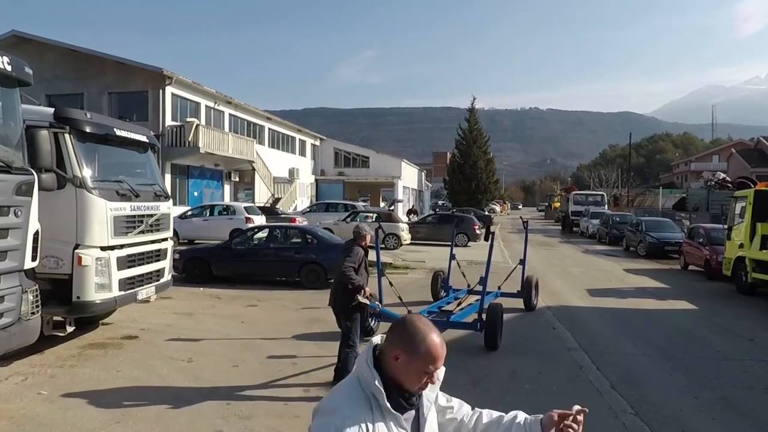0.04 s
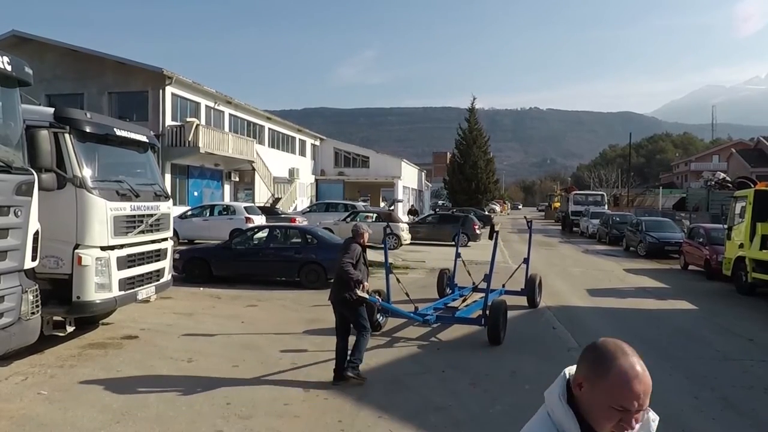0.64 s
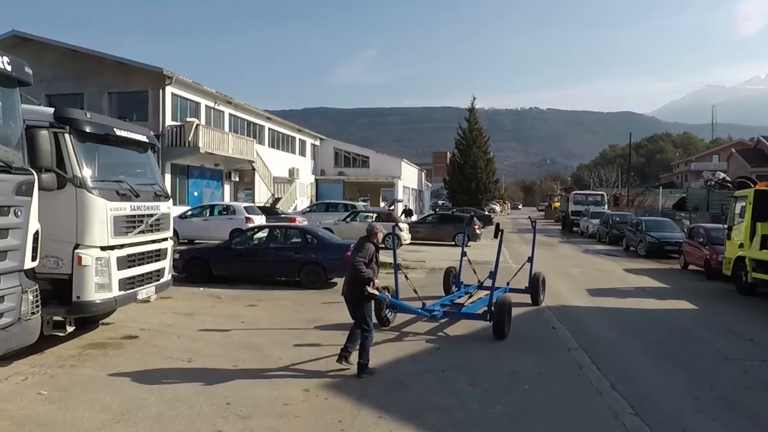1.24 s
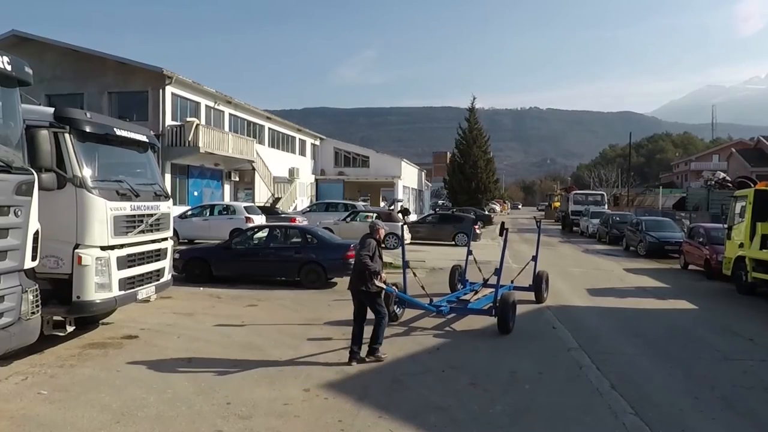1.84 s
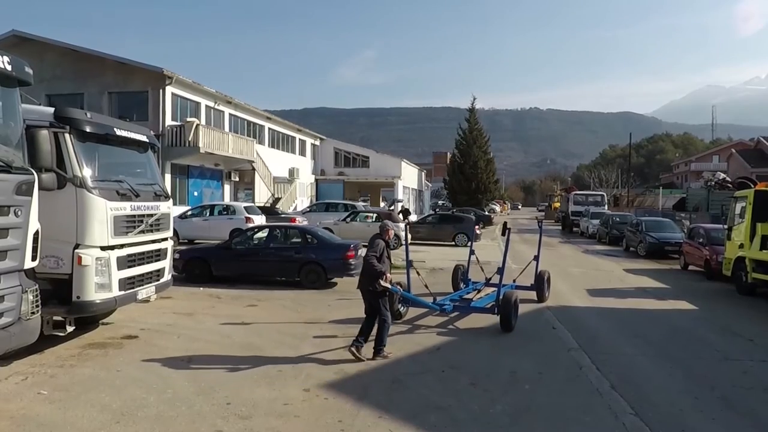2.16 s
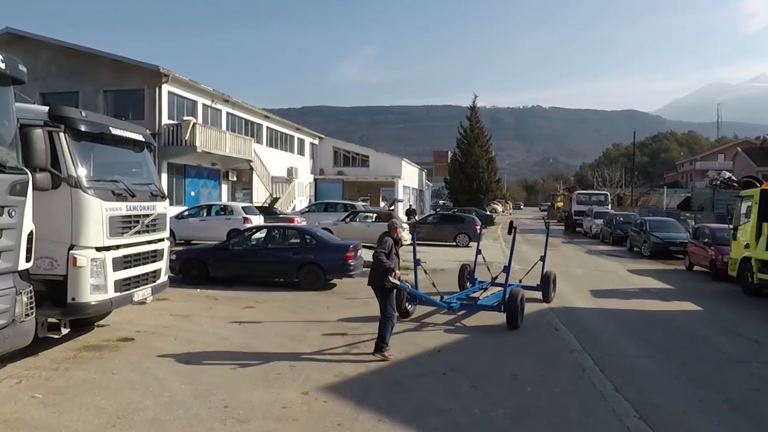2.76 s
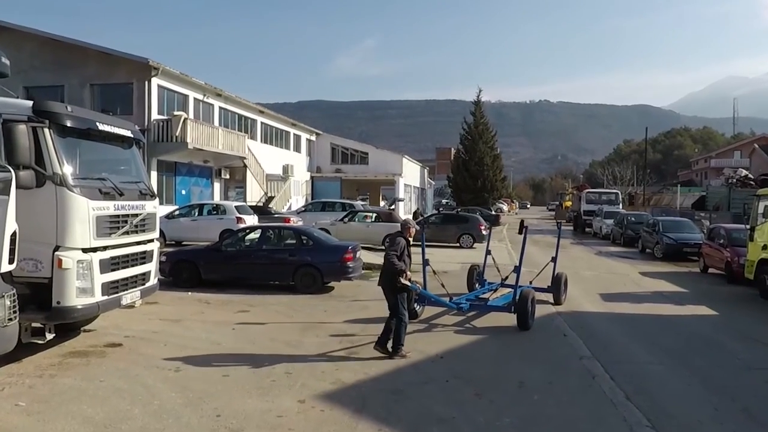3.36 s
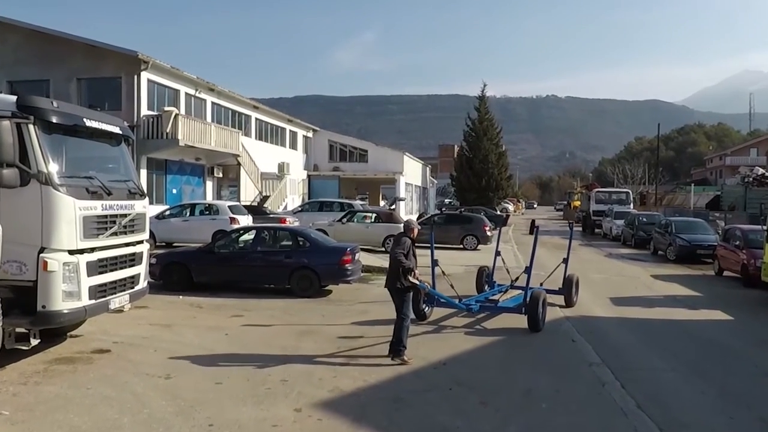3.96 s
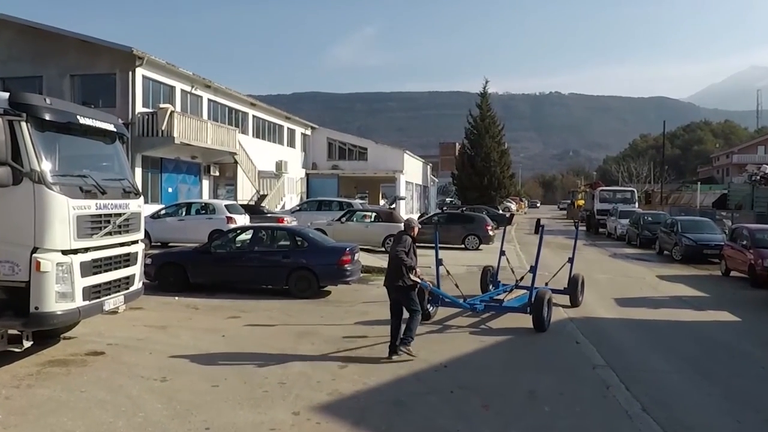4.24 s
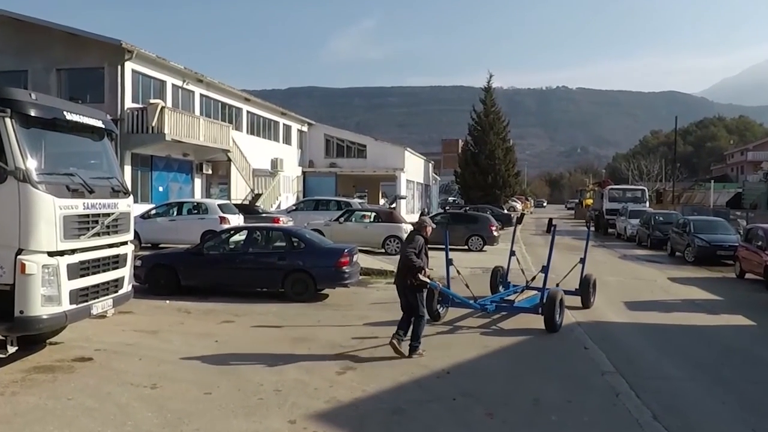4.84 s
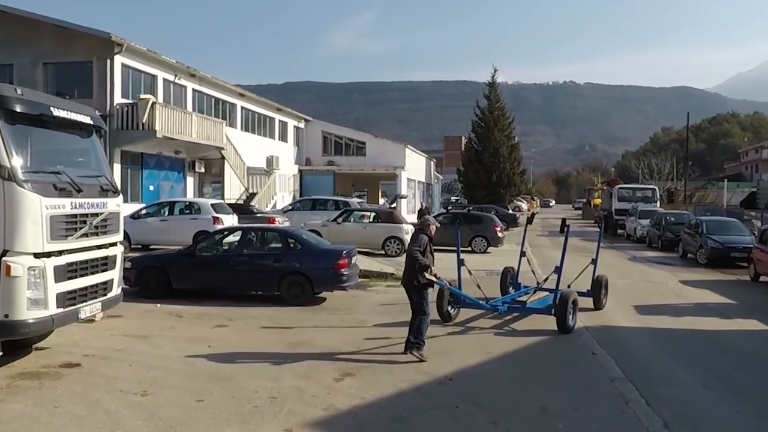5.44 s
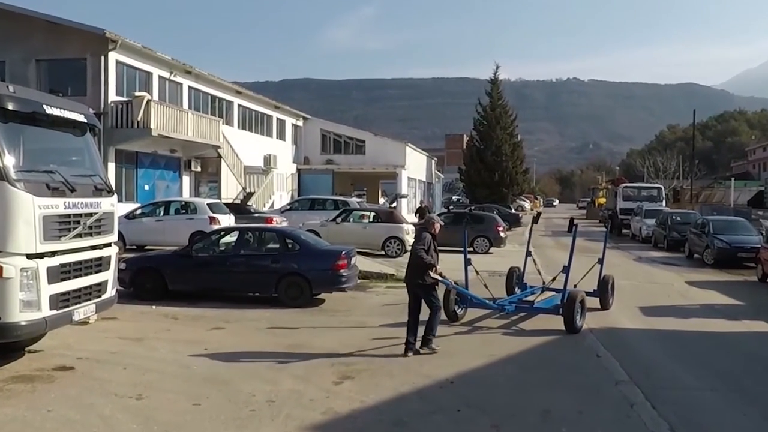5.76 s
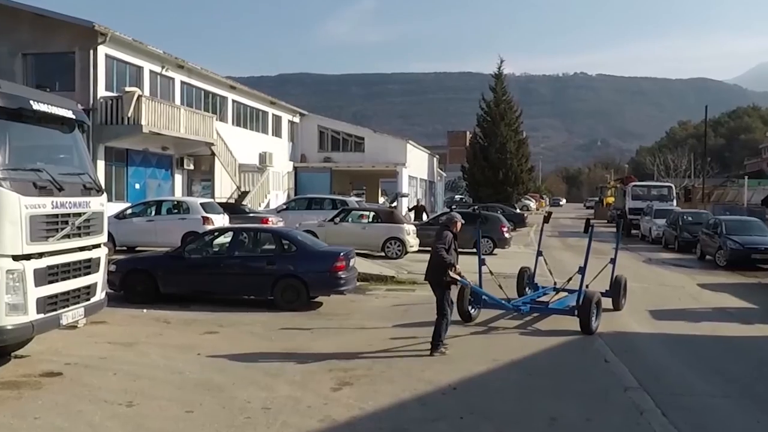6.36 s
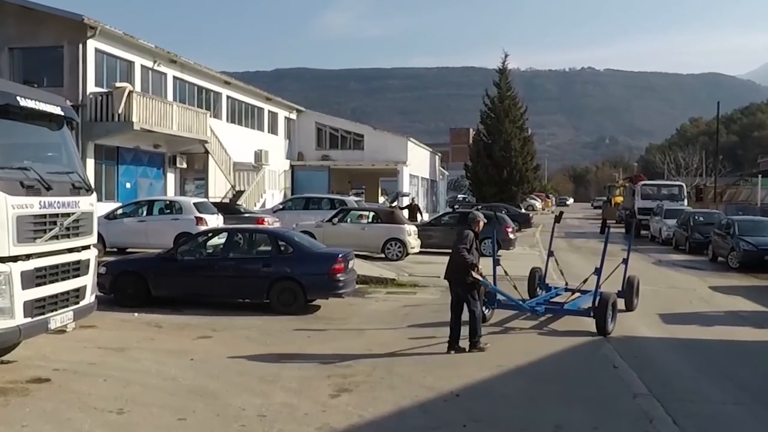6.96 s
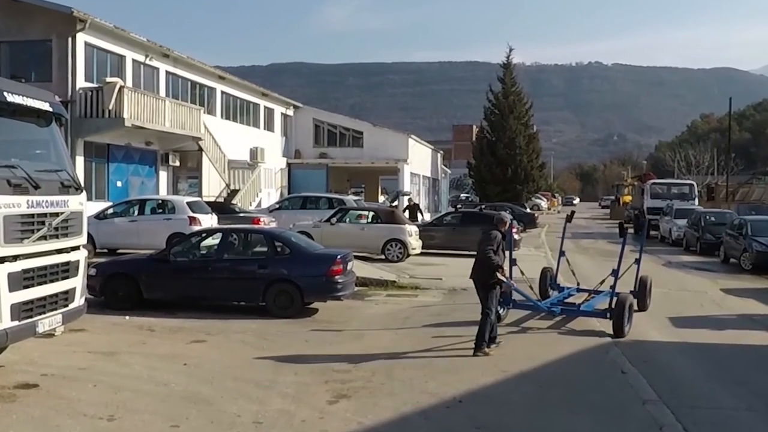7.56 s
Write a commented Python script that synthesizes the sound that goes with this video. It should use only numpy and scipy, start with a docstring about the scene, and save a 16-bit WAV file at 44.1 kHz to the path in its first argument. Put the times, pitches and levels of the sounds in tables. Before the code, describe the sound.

An engine idles with a deep, steady throb in an outdoor yard, over faint hiss and the gritty roll of a trailer pulled by hand across asphalt. Close thumps and scuffs come from the microphone being gripped, followed by one hard rattle, after which the background drops away and creeps back. The sound narrows from stereo to mono. Near the end the engine runs down and stops, and the trailer's wheels squeak thinly.

```python
"""First you hear an engine throbbing at idle, while a boat trailer is pulled by hand across an asphalt yard.
From two seconds on, a camera is gripped and shifted: thumps, scuffs and one hard rattle sound on its
mount, and after each heavy knock the background sinks and creeps back. The sound narrows to a single
microphone, then partly widens. Near the end the engine is switched off and the trailer's wheels squeak."""
import sys
import numpy as np
from scipy import signal
from scipy.fft import rfft, irfft, next_fast_len
from scipy.io import wavfile
from scipy.ndimage import uniform_filter1d

SR = 44100
rng = np.random.default_rng(int(sys.argv[2]) if len(sys.argv) > 2 else 0)


def transcribe(u):
    """Save the signal u as a 16-bit wav file named by the first command-line argument.

    u: samples, shape (n,) or (channels, n), limited to [-1, 1]; the rate is SR.
    q: integer samples, one column per channel.
    """
    v = np.clip(np.atleast_2d(u).T, -1, 1)
    q = np.round(v * 32767).astype(np.int16)
    wavfile.write(sys.argv[1], SR, q)


N = 338996
TIME = np.arange(N) / SR


def gain_of(db):
    """Turns decibels into a number to multiply by."""
    return 10 ** (np.asarray(db) / 20)


def evened(x):
    """Scales a signal to an average strength (rms) of 1."""
    return x / np.sqrt(np.mean(x ** 2) + 1e-20)


def over_time(points):
    """Joins (time, value) points with straight lines."""
    return np.interp(TIME, *np.transpose(points))


def over_pitch(points, hz):
    """Joins (pitch, value) points, giving each octave equal room."""
    pitches, values = np.transpose(points)
    return np.interp(np.log(hz + 1), np.log(pitches + 1), values)


def hump(f, hz, octaves):
    """A bell-shaped band of pitches around hz."""
    return np.exp(-.5 * (np.log2((f + 1) / hz) / octaves) ** 2)


def add(mix, start_s, sound):
    """Mixes a stereo sound in at start_s."""
    part = mix[:, max(round(start_s * SR), 0):][:, :sound.shape[1]]
    part += sound[:, :part.shape[1]]


def stereo(mid, side):
    """Both ears share mid; side is added on the left and taken away on the right."""
    return np.array([mid + side, mid - side])


def colour(x, gain):
    """Turns each pitch in x up or down by gain(hz)."""
    size = next_fast_len(x.shape[-1] + 2048)
    return irfft(rfft(x, size) * gain(np.fft.rfftfreq(size, 1 / SR)), size)[..., :x.shape[-1]]


def drift(rate_hz):
    """A smooth random wobble, about 1 in size."""
    knots = signal.resample(rng.standard_normal(1024), 8192)
    return np.interp(TIME * rate_hz * 16, np.arange(len(knots)), knots)


# How wide the noises sound: pitch_hz, side_over_mid_db
NOISE_WIDTH = [(60, 1), (110, -1), (200, 0.5), (370, 2), (690, 3.5), (1270, 1.5), (2340, -0.5), (4300, -3),
               (7910, 4.5), (14600, 0.5)]
# Which way they lean: pitch_hz, lean (-1 right, 1 left)
NOISE_LEAN = [(30, 0.21), (140, 0.054), (190, -0.32), (240, 0.98), (380, 0.38), (600, 0.46), (1100, -0.65),
              (2000, -0.37), (6000, -0.41), (12000, -0.2)]
def noise(tone):
    """Steady stereo noise, shaped by a table of pitches and levels."""
    common, stray = rng.standard_normal((2, N))
    shape = lambda hz: gain_of(over_pitch(tone, hz))
    wide = lambda hz: shape(hz) * gain_of(over_pitch(NOISE_WIDTH, hz))
    lean = lambda hz: np.clip(over_pitch(NOISE_LEAN, hz), -1, 1)
    mid = colour(common, shape)
    side = colour(common, lambda hz: wide(hz) * lean(hz))
    side += colour(stray, lambda hz: wide(hz) * np.sqrt(1 - lean(hz) ** 2))
    return stereo(mid, side) / np.std(mid)


# Dips in the background after heavy knocks: start_s, depth_db, hold_s, recovery_s
DIPS = [(2.032, 10, 0.022, 0.74), (2.333, 8, 0.18, 0.9), (3.664, 27, 0.55, 2.25)]
def dip_db(sink_s=.02):
    """How far the background has sunk: a quick fall, a hold, then a return that slows down."""
    deepest = np.zeros(N)
    for start_s, depth_db, hold_s, recovery_s in DIPS:
        sink = np.clip((TIME - start_s) / sink_s, 0, 1)
        remaining = np.clip(1 - (TIME - start_s - hold_s) / recovery_s, 0, 1) ** 1.41
        deepest = np.maximum(deepest, depth_db * sink * remaining)
    return deepest


def switch_off_db(fall_db, fall_s, start_s=6):
    """How far a sound has faded since the engine was switched off."""
    return fall_db * np.clip((TIME - start_s) / fall_s, 0, 1)


# Tone of a broad hiss and of a narrower, sharper sizzle: pitch_hz, relative_db
HISS_TONE = [(1530, -8), (2600, -3), (3190, -6.5), (4710, -2), (5820, -1), (6270, 0), (7260, -6),
             (8280, -11), (9310, -11.5), (12400, -20.5), (13700, -24), (14500, -52), (15000, -74)]
SIZZLE_TONE = [(4400, -34), (5000, -10.5), (5500, 2), (6200, 2), (7200, -3.5), (7700, -8), (8300, -31),
               (10000, -20), (12500, -32.5), (14000, -49)]
# Their loudness before the dips: time_s, level_db
HISS_LEVEL = [(0, -53), (.99, -53.5), (1.06, -49), (2, -47), (3.7, -48.5), (5.95, -46.5), (6.6, -50.5),
              (7.69, -51)]
SIZZLE_LEVEL = [(0, -64), (1.01, -66), (1.05, -50.5), (2, -49), (2.8, -51.5), (3.6, -48.5), (4.6, -58.5),
                (6.6, -71), (7.5, -50)]
def far_hiss(flicker_db=1):
    """A distant, flickering hiss; after a second it steps up and a sizzle cuts in."""
    hiss = noise(HISS_TONE) * gain_of(over_time(HISS_LEVEL) - dip_db() + flicker_db * drift(25))
    sizzle = noise(SIZZLE_TONE) * gain_of(over_time(SIZZLE_LEVEL) - dip_db() + flicker_db * drift(25))
    return hiss + sizzle


# Tone of the deep buffeting and of the rumble: pitch_hz, relative_db
BUFFET_TONE = [(6, -19.5), (14, 0.5), (30, -4.5), (42, -13), (65, -10.5), (100, -20), (200, -50),
               (500, -140)]
RUMBLE_TONE = [(8, -17.5), (15, 1.5), (35, -4.5), (70, 2.5), (105, 3), (140, 7), (185, -5.5), (235, -9),
               (280, -2), (320, -8), (400, -15), (520, -26), (800, -52), (1600, -120)]
# Loudness of the rumble before the dips: time_s, level_db
RUMBLE_LEVEL = [(0, -32.5), (2, -31), (3.6, -29), (4.2, -30), (4.8, -26), (5.5, -29.5), (6.3, -28),
                (6.5, -30.5), (7, -38.5), (7.69, -41.5)]
def low_rumble(firings, pulse_depth=.47, buffet_db=-37, buffet_rise_db=6, wobble_db=1):
    """A rumble pulses with the engine, over buffeting that grows as the engine stops."""
    stopped = np.clip((TIME - 6.6) / .36, 0, 1)
    buffet = noise(BUFFET_TONE) * gain_of(buffet_db - dip_db() + buffet_rise_db * stopped)
    turning = TIME < FIRING_RATE[-1][0]
    pulse = 1 + pulse_depth * np.cos(2 * np.pi * (firings - BODY_LAG)) * turning
    rumble = noise(RUMBLE_TONE) * gain_of(over_time(RUMBLE_LEVEL) - dip_db() + wobble_db * drift(7.3))
    return buffet + pulse * rumble


# The engine idles, then runs down: time_s, firings_per_s
FIRING_RATE = [(0, 27.33), (6, 27.37), (6.27, 25.3), (6.42, 19.6), (6.6, 17), (6.8, 10.5)]
def count_firings(first_s=.0106):
    """How many times the engine has fired so far, as a smoothly rising count."""
    return np.cumsum(over_time(FIRING_RATE)) / SR - first_s * FIRING_RATE[0][1]


BODY_LAG = .28  # the engine's body answers each throb this share of a firing later
# Engine tones; four unequal cylinders add halves and quarters:
# multiple_of_firing_rate, relative_db, side_share (positive leans left)
ENGINE_TONES = [(.5, -6, 0), (1, 0, .1), (1.5, -18, 0), (2, -9.5, .15), (2.5, -21, .1), (3, -14.5, .3),
                (3.75, -21, -.2), (4, -11, .1), (5, -9.5, -.2), (5.25, -11.5, -.1), (5.5, -19, -.3),
                (6, -16.5, -.1), (7, -30, -1.8), (8, -25, 1.3), (8.34, -23, 1.1), (9, -23, 1.3),
                (9.75, -24.5, 1.2), (10, -21.5, 1.1), (10.5, -28, 1.4), (11, -29, .6), (12, -29, 1.2),
                (13, -25, 1.7), (14, -29, 1.3), (14.25, -35, 1.7), (15, -38, 1), (16, -37, -.9),
                (18, -35, -.1), (19, -34, 1.1)]
def engine(firings, idle_db=-22, body_above_multiple=2.4, loose_multiple=9):
    """Low tones line up into a throb and a chug at each firing; all die as the engine stops."""
    firings = firings + .009 * drift(3)  # the speed is never quite steady
    out = np.zeros((2, N))
    for multiple, db, side in ENGINE_TONES:
        strength = gain_of(db) * (1 + (.04 + .02 * multiple) * drift(5))
        lag = BODY_LAG * (multiple > body_above_multiple)
        looseness = min((multiple / loose_multiple) ** 3, 1)  # high tones fall out of step
        cycles = multiple * (firings - lag) + looseness * rng.uniform(-.5, .51)
        tone = strength * np.cos(2 * np.pi * cycles)
        out += stereo(tone, side * tone)
    level_db = idle_db - 1.15 * dip_db() - switch_off_db(fall_db=10.5, fall_s=.5)
    running = np.clip((6.85 - TIME) / .39, 0, 1)
    return np.sqrt(2) * out * gain_of(level_db) * running


def engine_stall(firings, peak_s=6.68, spread_s=.048, level_db=-17.5, octave_db=-4):
    """The engine's last slow strokes swell into one deep lurch."""
    swell = gain_of(level_db) * np.exp(-.5 * ((TIME - peak_s) / spread_s) ** 2)
    return swell * (np.cos(2 * np.pi * firings) + gain_of(octave_db) * np.cos(4 * np.pi * firings))


# Tone of tyres on asphalt: pitch_hz, relative_db
TYRE_TONE = [(200, -32), (400, -4.5), (510, -1), (640, -6.5), (1150, -5.5), (1350, -9.5), (2050, -11.5),
             (2600, -23.5), (3100, -15), (4200, -21), (5500, -48.5), (9000, -120)]
def trailer_tyres(rolling_db=-43.5, grit_db=1):
    """Tyres roll with a gritty noise that gets quieter as the engine runs down."""
    level_db = rolling_db - dip_db() - switch_off_db(fall_db=8.5, fall_s=.65)
    return noise(TYRE_TONE) * gain_of(level_db + grit_db * drift(45))


# Wheel squeaks: start_s, end_s, pitch_hz, level_db, waver (share of the pitch), roughness (0 to 1)
SQUEAKS = [(6.297, 7.73, 1415, -59.5, 0.0075, .6), (6.4, 7.73, 1810, -59.5, 0.0054, 0.7),
           (7.229, 7.31, 3480, -53, .025, .7), (7.418, 7.525, 3170, -47.5, .011, .8),
           (7.432, 7.495, 3040, -47.5, .004, .35)]
def wheel_squeaks(flutter_db=3, side=-.76, onset_share=.047):
    """The trailer's wheels give thin, rasping tones on the right; each catches quickly and fades."""
    out = np.zeros(N)
    for start_s, end_s, hz, db, waver, roughness in SQUEAKS:
        progress = np.clip((TIME - start_s) / (end_s - start_s), 0, 1)
        swell = np.minimum(progress / onset_share, 1) * np.sqrt(1 - progress)
        cycles = np.cumsum(hz * (1 + waver * drift(20))) / SR
        rasp = evened(colour(rng.standard_normal(N), lambda f: hump(f, hz, octaves=2.6 * waver)))
        voice = np.sqrt(1 - roughness) * np.sin(2 * np.pi * cycles) + np.sqrt(roughness / 2) * rasp
        out += swell * gain_of(db + flutter_db * drift(14)) * voice
    return stereo(out, side * out)


# Brushes, snaps and scrapes: start_s, level_db, swell_s, pitch_hz, width_octaves
SCUFFS = [(.41, -47, 0.013, 5060, 0.37), (.58, -49, 0.017, 4940, 0.63), (2.035, -33, 0.0043, 450, 0.8),
          (2.104, -47.5, 0.023, 2000, 1.04), (2.134, -44, 0.019, 2800, 0.96),
          (2.16, -38.5, 0.015, 1550, 1.1), (2.333, -29, 0.006, 636, 1.4), (2.332, -44, 0.0038, 6900, 0.54),
          (2.349, -38.5, 0.017, 650, 0.81), (2.621, -42.5, 0.0016, 6300, 0.5),
          (2.945, -40, 0.0053, 1400, 1.26), (3.012, -40, 0.0087, 1400, 1.3),
          (3.17, -42.5, 0.022, 804, 0.79), (3.657, -22, 0.0081, 385, 0.52), (4.286, -53, 0.0084, 650, 1.26),
          (4.305, -67.5, .025, 2300, 0.65), (4.537, -38.5, 0.0051, 900, 1.15),
          (4.537, -48, 0.0043, 5670, 0.28), (4.553, -48, 0.013, 420, 0.78), (4.562, -53, .02, 800, .7),
          (4.366, -65, .003, 4230, 0.13), (4.725, -52.5, 0.009, 5300, 0.42),
          (5.038, -43, 0.0044, 630, 0.74), (6.09, -40, 0.031, 480, 0.9), (6.284, -31, 0.0078, 540, 0.9),
          (6.66, -33.5, 0.0033, 850, 0.78), (7.405, -46, 0.044, 696, 1.2), (7.416, -44.5, .011, 3620, 0.25),
          (7.576, -49.5, 0.015, 1750, .3), (7.651, -49, 0.011, 2190, 0.52)]
def scuffs(side_db=1, grain_db=3, lean=-.8):
    """Fingers and shoes brush in short, grainy strokes that swell and die away."""
    out, t = np.zeros((2, N)), np.arange(SR // 3) / SR
    for start_s, db, swell_s, hz, octaves in SCUFFS:
        bumps = evened(uniform_filter1d(rng.standard_normal(len(t)), size=60))
        grains = rng.standard_normal((2, len(t))) * gain_of(grain_db * bumps)
        band = lambda f: hump(f, hz, octaves) / (1 + (f / 12500) ** 8)
        mid, stray = evened(colour(grains, band))
        stroke = (t / swell_s * np.exp(1 - t / swell_s)) ** .77
        add(out, start_s, gain_of(db) * stroke * stereo(mid, gain_of(side_db) * (stray + lean * mid)))
    return out


# Shifts of the camera on its mount: peak_s, level_db, rise_and_fall_db_per_s
SHIFTS = [(2.031, -15, 148), (3.712, -20, 75), (7.46, -27.5, 58)]
def camera_shifts(rub_db=-26, rub_top_hz=1600, wobble_db=1):
    """Moving the camera makes a low shudder with a little dull rubbing above it."""
    swell = sum(gain_of(db - slope * abs(TIME - peak_s)) for peak_s, db, slope in SHIFTS)
    rub = colour(noise(TYRE_TONE), lambda f: 1 / (1 + (f / rub_top_hz) ** 4))
    return swell * gain_of(wobble_db * drift(18)) * (noise(RUMBLE_TONE) + gain_of(rub_db) * rub)


# Natural tones of the camera on its mount:
# pitch_hz, relative_db, ring_s (time to fade 60 dB when damping is 1), side_share
MOUNT_TONES = [(195, -4, .14, .1), (240, 0, .3, 1.1), (265, -2, .25, 1.2), (355, -9, .12, 1.25),
               (409, -6, .08, 1.4), (495, -8, .08, 1.8), (645, -6, .08, 2.1), (790, -10, .07, 2.1),
               (915, -7, .08, 2.1), (1020, -7, .07, -2), (1227, -7, .07, 2), (1437, -10, .05, -2),
               (1600, -10, .05, 2), (1790, -9, .06, -1.9), (2070, -11, .06, 1.8), (2400, -19, .04, -1.6),
               (2720, -21, .04, 1.5), (3030, -17, .07, 1), (3280, -20, .05, -1), (3650, -24, .03, 1)]
def mount_ring(t, weight, damping, scatter):
    """One blow rings the mount's tones, each as strongly as weight(hz); every grip detunes them a bit."""
    hz, db, ring_s, side = np.transpose(MOUNT_TONES)[:, :, None]
    detune = 1 + scatter * rng.standard_normal(hz.shape)
    direction = (-1) ** ((np.arange(len(hz)) + 1) // 2)[:, None]  # pairs swing opposite ways
    fade = gain_of(db - 60 * t * damping / ring_s)
    tones = direction * weight(hz) * fade * np.sin(2 * np.pi * hz * detune * t)
    mid = tones.sum(0)
    return stereo(mid, (side * tones).sum(0)) / abs(mid).max()


# Hard clacks, single or in one dying rattle:
# start_s, level_db (before trim_db), pitch_hz, width_octaves, tick_db, relative_ring_time
CLACKS = [(2.038, -15, 370, .5, -60, .4), (2.0411, -20, 1000, 1, -43, 0.4),
          (2.0412, -19, 2070, .13, -55, .6), (2.336, -14.5, 614, 1.6, -27, .9),
          (2.918, -24.5, 1800, 0.55, -43, .4), (2.952, -31.5, 1500, 1, -50, .35),
          (3.027, -26, 1400, 1.2, -46, 0.26), (3.66, -14, 380, .9, -55, 0.45),
          (3.668, -20, 650, 1, -50, 0.48), (3.675, -11.5, 896, 1.7, -27, 0.5),
          (3.68, -15.5, 650, 1, -38, 0.36), (3.69, -7, 950, 1.2, -27, 0.36),
          (3.696, -22, 1000, 1.4, -35, 0.34), (3.706, -33.5, 3080, 0.081, -64, 0.37),
          (3.712, -18.5, 1000, 1.4, -34, 0.56), (3.733, -22, 1000, 1.6, -48, 0.39),
          (3.743, -25, 1190, 1.6, -48, .3), (3.751, -19.5, 1000, 1.3, -48, 0.35),
          (3.765, -24, 1500, 2.4, -33.5, 0.42), (3.769, -21, 1090, 1.2, -50, .33),
          (3.777, -24, 1200, 1.4, -46, 0.38), (3.792, -31, 1400, 0.85, -51, .45),
          (3.799, -28, 1000, 1.5, -52, .33), (3.808, -28, 2000, 2.7, -43, 0.41),
          (3.815, -23.5, 1100, 1.2, -50, .33), (3.821, -35, 890, 1.5, -47, .35),
          (3.83, -32, 2600, 1.5, -53, .38), (3.866, -30, 1200, 2.2, -51, 0.28),
          (3.902, -49, 2500, 1.1, -46, .3), (3.911, -41, 2280, 1.6, -62, 0.3),
          (4.537, -27, 950, 1.5, -30, 0.66), (4.547, -35, 700, 1.2, -50, 0.96),
          (4.568, -32, 1140, .7, -40, 0.7), (6.287, -25.5, 620, 1.6, -65, 0.48)]
def mount_clacks(trim_db=-1.5, chatter=.092, chatter_s=.0049, tick_s=.0022, low_hz=3200, top_hz=6300):
    """Loose parts strike and chatter, briefly ringing the mount under a dry tick."""
    out, t = np.zeros((2, N)), np.arange(SR // 6) / SR
    tick_band = lambda f: f ** 2 / (f ** 2 + low_hz ** 2) / (1 + (f / top_hz) ** 8)
    for start_s, db, hz, octaves, tick_db, ring_time in CLACKS:
        force = chatter * rng.standard_normal(len(t)) * np.exp(-t / chatter_s)
        force[0] += 1  # the strike itself
        ring = mount_ring(t, lambda f: hump(f, hz, octaves), damping=1.28 / ring_time, scatter=.023)
        body = signal.fftconvolve(ring, force[None], axes=1)[:, :len(t)]
        body /= abs(body.mean(0)).max()
        snap = rng.standard_normal((2, len(t))) * np.exp(-t / tick_s) * (1 - np.exp(-4 * t / tick_s))
        tick = 2 * colour(snap, tick_band)
        add(out, start_s, gain_of(db + trim_db) * body + gain_of(tick_db) * tick)
    return out


# Soft blows of the hand, and the short low thud under each clack of the rattle (3.677 to 3.812 s): start_s,
# level_db, sway_pitch_hz, ring_over_sway_db, fade_s (to fall 60 dB)
THUMPS = [(2.008, -20, 134, 0, 0.24), (2.036, -4.5, 134.6, -12, 0.49), (2.348, -4, 141.7, -6.5, 0.42),
          (2.493, -12, 139.7, -10, 0.4), (2.559, -13, 137.6, -12.5, 0.16), (2.931, -16, 138.5, -9, 0.31),
          (3.223, -9.5, 140, -6, 0.17), (3.286, -9.5, 139.1, -5.5, 0.43), (3.622, -12, 128.6, -12, 0.22),
          (3.66, -3.5, 152.3, -1.5, 0.093), (3.677, -5, 160, -1, .05), (3.692, -5, 125, -3.5, .06),
          (3.712, -8, 110, -7, .035), (3.732, -13, 150, -4, 0.036), (3.75, -11, 143, 0, 0.04),
          (3.767, -7, 120, -6, .05), (3.779, -8.5, 100, -8, .06), (3.801, -12, 149, -3, 0.044),
          (3.812, -12.5, 151, -2, 0.093), (3.885, -21, 121, -23, 0.31), (4.285, -22.5, 134, -8.5, 0.31),
          (6.136, -18.5, 114, -6, 0.28), (7.3, -21.5, 104, -29, 0.44), (7.41, -22, 106.3, -20, 0.89),
          (7.485, -18, 135.8, -3.5, 0.39)]
def low_thumps(top_hz=330, rise_s=.004, sway_side=-.29):
    """A soft blow, or the thud under a clack, sways the whole mount and rings only its lowest tones."""
    out, t = np.zeros((2, N)), np.arange(SR // 2) / SR
    lows_only = lambda f: 1 / (1 + (f / top_hz) ** 4)
    main_ring_s = MOUNT_TONES[1][2]
    for start_s, db, hz, ring_db, fade_s in THUMPS:
        sway = np.sin(2 * np.pi * hz * t) * gain_of(-60 * t / fade_s)
        ring = mount_ring(t, lows_only, damping=main_ring_s / fade_s, scatter=.018)
        blow = stereo(sway, sway_side * sway) + gain_of(ring_db) * ring
        add(out, start_s, gain_of(db) * blow * (1 - np.exp(-t / rise_s)))
    return out


def scene():
    """The yard, engine and trailer, with the handling of the camera on top."""
    firings = count_firings()
    background = engine(firings) + engine_stall(firings) + low_rumble(firings) + far_hiss()
    trailer = trailer_tyres() + wheel_squeaks()
    handling = scuffs() + camera_shifts() + mount_clacks() + low_thumps()
    return background + trailer + handling


# How wide everything sounds: time_s, width (0 one microphone, 1 full stereo)
STEREO_WIDTH = [(3.8, 1), (4.52, 0.01), (6.47, 0), (7.05, 0.59)]
# Tone of the single microphone: pitch_hz, gain_db
SINGLE_MIC_TONE = [(14, 4), (28, -0.5), (60, 6.5), (100, 1), (145, -3.5), (210, 3), (300, -4), (480, -1),
                   (1000, -2), (2500, 0.5), (4300, 0), (6200, -5), (7300, -3.5), (8500, 4), (10500, -1),
                   (14000, 2.5)]
def record(dry, fade_s=.004, top_hz=15200):
    """Two microphones fade to one and partly back; peaks are rounded and the highest treble is cut."""
    width = np.clip(over_time(STEREO_WIDTH), 0, 1)
    single = colour(dry.mean(0), lambda hz: gain_of(over_pitch(SINGLE_MIC_TONE, hz)))
    heard = width * dry + (1 - width) * single
    rounded = heard / (1 + heard ** 8) ** (1 / 8)
    end_fades = np.clip(np.minimum(TIME, TIME[-1] - TIME) / fade_s, 0, 1)
    treble_cut = signal.firwin(511, top_hz, window=("kaiser", 9), fs=SR)
    return signal.oaconvolve(rounded * end_fades, treble_cut[None], "same")


dry = scene()
out = record(dry)
transcribe(out)
```